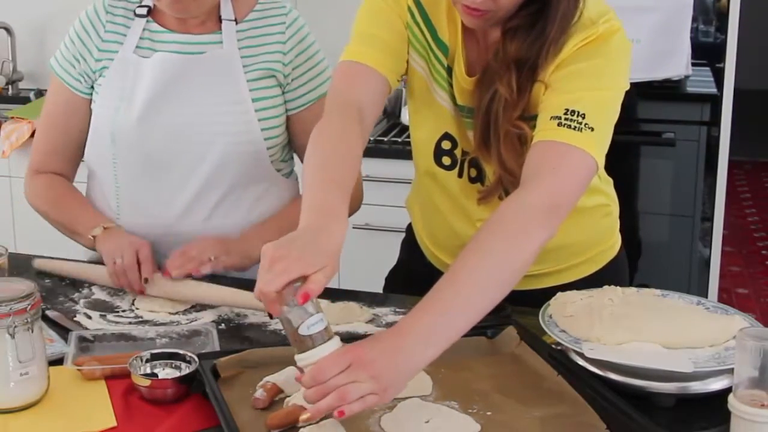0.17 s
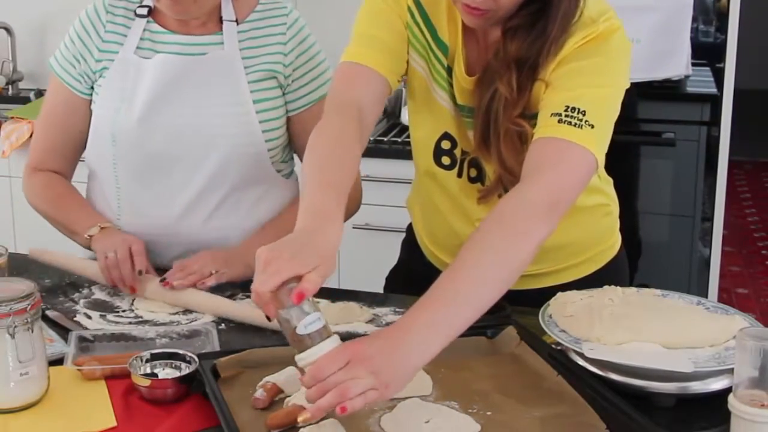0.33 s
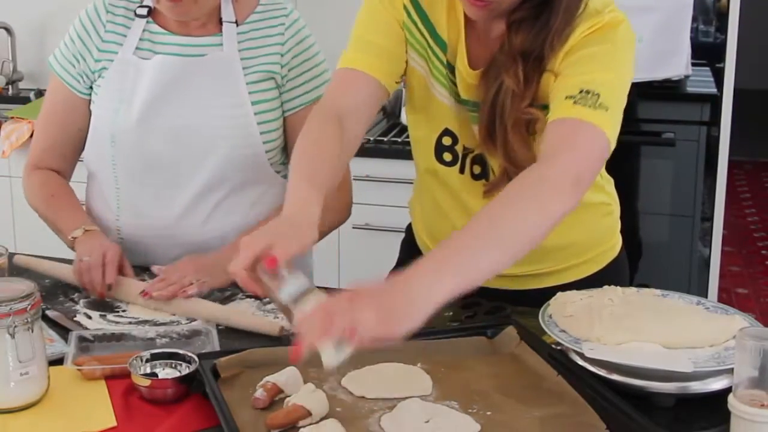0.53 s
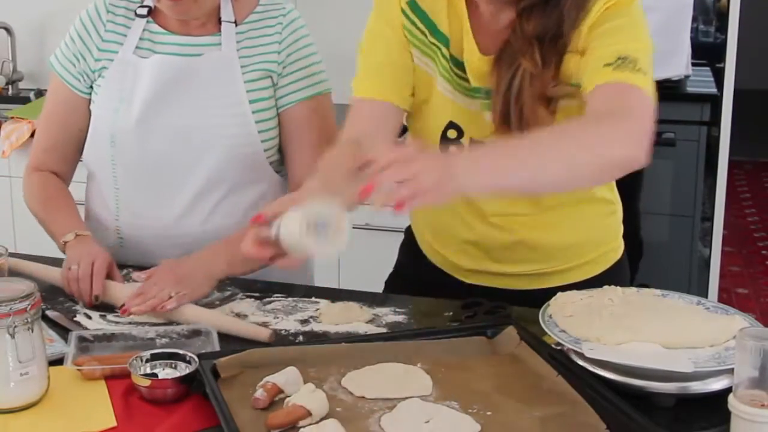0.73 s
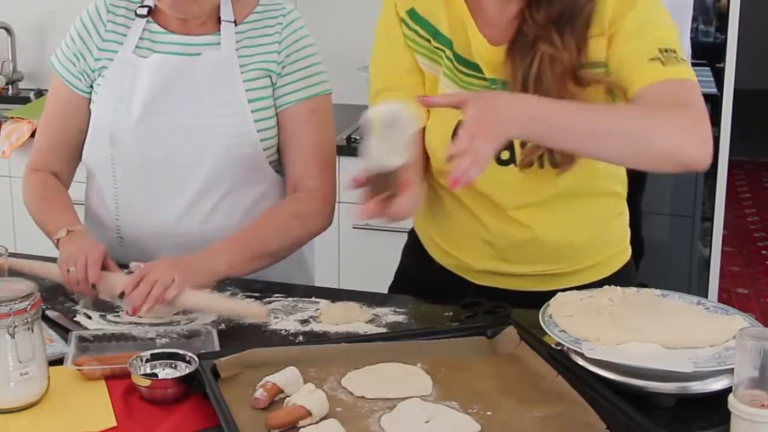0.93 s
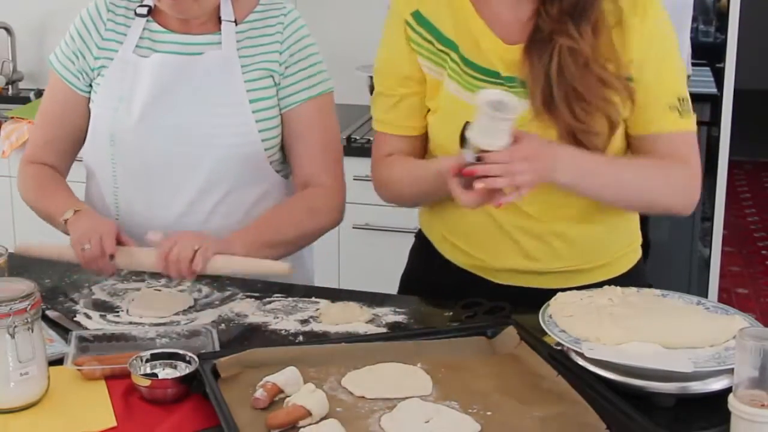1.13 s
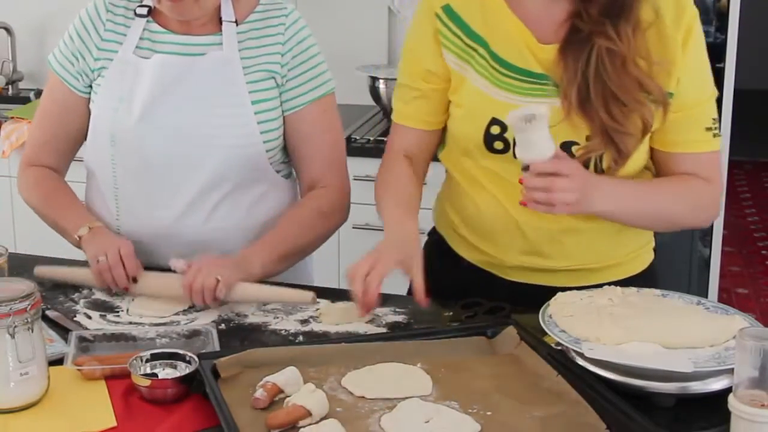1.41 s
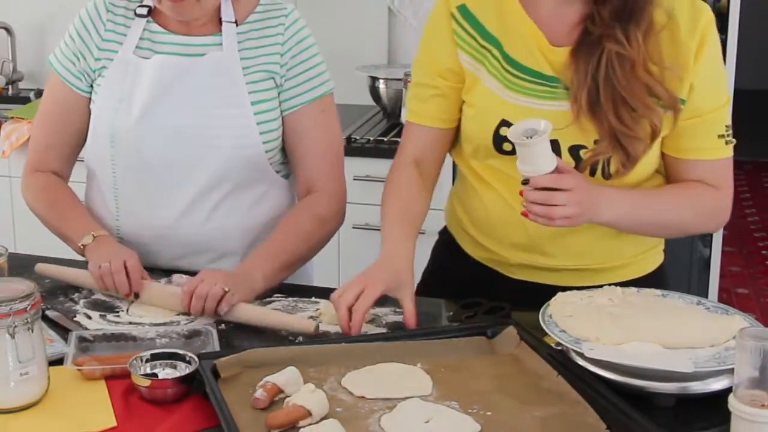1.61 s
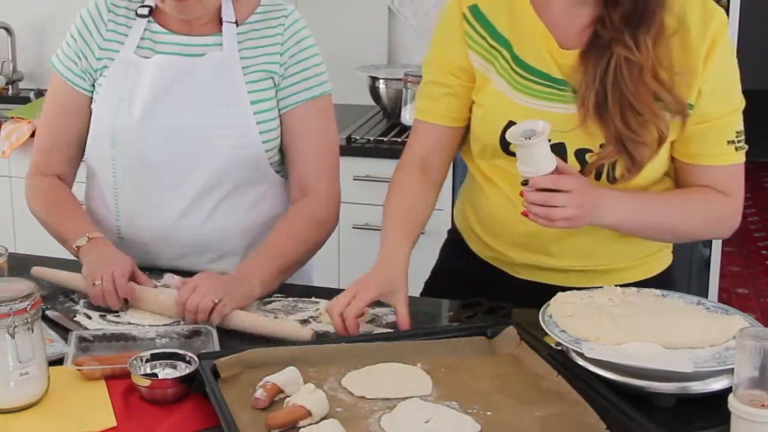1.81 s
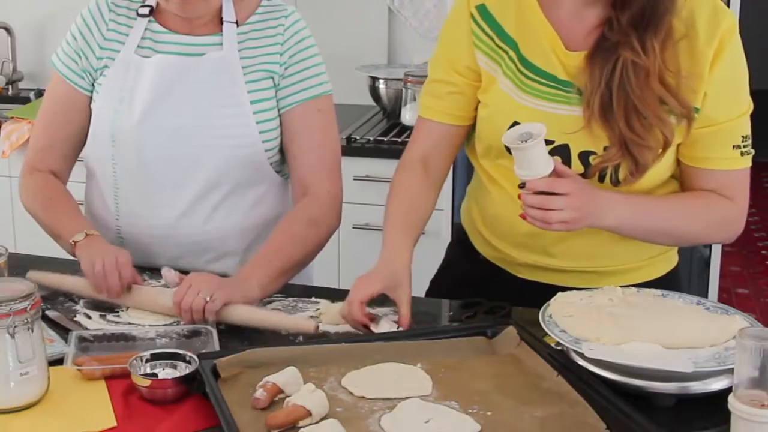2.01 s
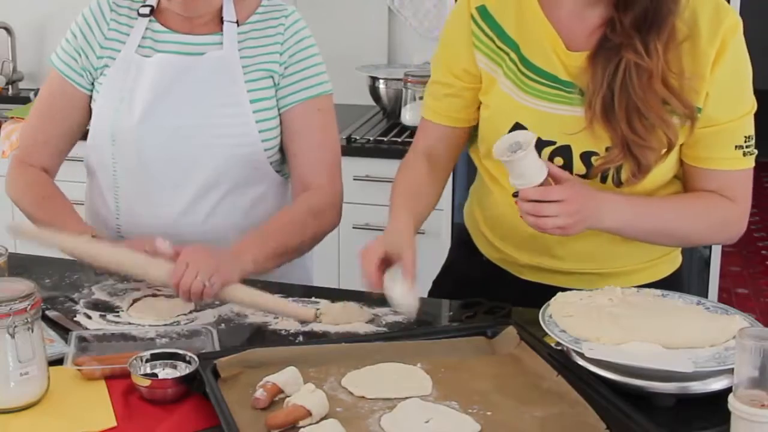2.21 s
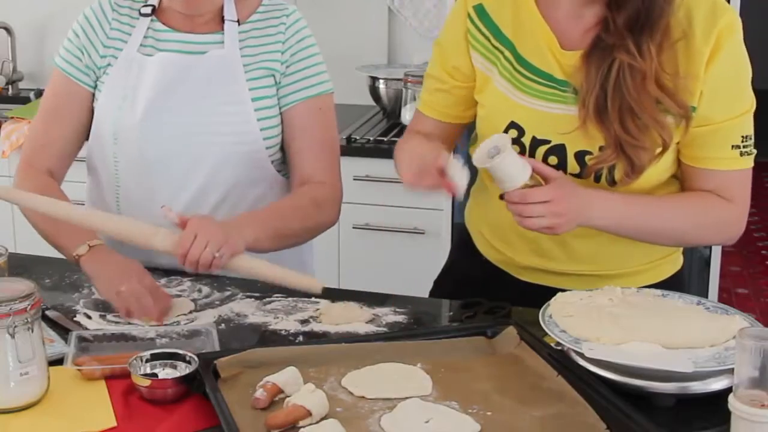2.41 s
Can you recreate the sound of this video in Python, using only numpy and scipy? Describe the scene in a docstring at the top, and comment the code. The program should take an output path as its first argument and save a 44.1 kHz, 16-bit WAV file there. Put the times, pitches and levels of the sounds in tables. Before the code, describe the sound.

A wooden rolling pin knocks sharply twice on a stone worktop, then once more softly; later a jar cap taps twice with a tiny glass clink and clicks shut, in a quiet hard-walled kitchen, close stereo microphone.

```python
"""Small dry ticks over a steady room tone, then a long wooden rolling pin knocks on a stone worktop.
Later a spice jar's cap is tapped down twice, with a clink of glass, and clicked back on; hands rustle faintly.
Struck bodies are sums of damped resonances, muted by contact time; ticks are single heavily damped rings.
A hard-walled kitchen carries each short knock on; tone, rustle and traffic are coloured noise, hum is sines."""
import sys
import numpy as np
from scipy import signal
from scipy.fft import rfft, irfft, next_fast_len
from scipy.io import wavfile
from scipy.ndimage import map_coordinates

SR = 44100
rng = np.random.default_rng(int(sys.argv[2]) if len(sys.argv) > 2 else 0)


def to_wav(sig):
    """Store sig (one row per channel, or 1-D mono) as 16-bit WAV at the path in sys.argv[1].

    Samples outside -1..1 are clipped; the rate is SR.
    """
    pcm = np.clip(np.atleast_2d(sig), -1, 1) * 32767
    pcm = np.round(pcm).astype(np.int16)
    wavfile.write(sys.argv[1], SR, pcm.T)  # frames by channels


def gain_from_decibels(decibels):
    """Convert decibel values to linear amplitude factors."""
    exponent = np.asarray(decibels, float) / 20
    return 10 ** exponent


N = 112454  # samples

# pin blows: start_s, strength_db, contact_ms, thud_db
PIN_KNOCKS = [(.2005, -26, 0.098, -10.5), (.3372, -25.5, 0.17, -9.5), (1.492, -30.5, 0.14, -5.5)]
# pin: dry crack, bending modes in order, slower twin of the main mode, high rattle: center_hz, width_hz, level_db
PIN_MODES = [(2680, 2900, 18.5), (620.6, 25.8, -8), (1358, 52, 3.5), (2410, 126, 11), (3585, 172, 8.5),
             (5036, 180, 0), (1364.4, 6.7, -7), (3260, 560, 10.5)]
# blow position along the pin: spot (0-1)
PIN_SPOTS = [.03, .165, .12]


def rolling_pin():
    """Bending modes of a wooden bar, weighted by where it lands; worktop and cupboard answer."""
    return knocks(PIN_KNOCKS, PIN_MODES, cabinet, PIN_SPOTS)


# cap taps: start_s, strength_db, contact_ms, thud_db
CAP_KNOCKS = [(2.0195, -33.5, 0.11, -13), (2.179, -33, 0.085, -15)]
# cap modes by number of nodes round the rim, wide ones are clatter: center_hz, width_hz, level_db
CAP_MODES = [(1091, 46, 5), (3375, 60, 5.5), (1700, 136, 8.5), (400, 150, 1), (1420, 310, 8.5),
             (3790, 390, 11), (3000, 210, 5), (4700, 3800, 22), (2000, 2500, 16.5)]
# tap position round the rim: spot (0-1)
CAP_SPOTS = [.245, .48]


def spice_cap():
    """Rim modes of the cap, weighted by where it strikes, with the worktop thud."""
    return knocks(CAP_KNOCKS, CAP_MODES, modes(WORKTOP_MODES), CAP_SPOTS)


# glass contacts, no thud: start_s, strength_db, contact_ms
GLASS_KNOCKS = [(2.0195, -60, 0.0135), (2.028, -47.5, 0.026)]
# glass resonances: center_hz, width_hz, level_db
GLASS_MODES = [(5830, 300, 13), (7400, 980, 12.5), (9720, 380, 14.5), (13300, 310, -5), (10900, 6800, 18)]


def glass():
    """Glass touches glass: high modes under very short contacts."""
    return knocks(GLASS_KNOCKS, GLASS_MODES, cabinet, [0, 0])


# cap closing on the jar: start_s, strength_db, contact_ms, thud_db
JAR_KNOCKS = [(2.4755, -48, 0.038, -6)]
# hollow jar resonances: center_hz, width_hz, level_db
JAR_MODES = [(641, 15.7, 0.5), (1360, 120, 2.5), (4200, 330, 2)]


def jar():
    """The cap closes on the hollow jar, ringing its modes and the worktop."""
    return knocks(JAR_KNOCKS, JAR_MODES, cabinet, [0])


def knocks(rows, body, base, spots):
    """A body rings and its base thuds; the spot weighs the modes, longer contact mutes the high ones."""
    room = kitchen()
    out = 0
    for (start_s, strength_db, contact_ms, *thud_db), spot in zip(rows, spots):
        struck = []
        for k, (center_hz, width_hz, level_db) in enumerate(body):
            spot_gain = abs(np.cos(np.pi * k * spot)) + 0.081
            struck.append((center_hz, width_hz, level_db + 20 * np.log10(spot_gain)))
        thud_gain = gain_from_decibels(np.array(thud_db)).sum()  # 0 if the row has no thud

        def response(hz):
            ring = modes(struck)(hz) + thud_gain * base(hz)
            return gain_from_decibels(strength_db) * ring / (1 + 1j * hz * contact_ms / 1000) ** 6

        out = out + placed(start_s, response, room)
    return out


# worktop resonances: center_hz, width_hz, level_db
WORKTOP_MODES = [(244, 136, 7), (458, 96, 6.5), (1070, 100, -7), (1114, 140, 7), (2000, 860, 17)]
# boom of the cupboard under the worktop: center_hz, width_hz, level_db
CUPBOARD_MODES = [(60.8, 18, -6), (162.4, 79, 4)]


def cabinet(hz):
    """The worktop thuds at once; cupboard air swells in after it, each resonance acting twice."""
    out = modes(WORKTOP_MODES)(hz)
    for row in CUPBOARD_MODES:
        out = out + modes([row])(hz) * resonance(hz, row[0], row[1])
    return out


# small dry ticks: start_s, strength_db, center_hz, width_hz
TICKS = [(0.032, -35.5, 3000, 1200), (0.05, -40.5, 7000, 5000), (0.26, -26.5, 7400, 6000),
         (.3765, -31.5, 7000, 4860), (0.879, -38.5, 1220, 200), (1.086, -38, 3700, 1500),
         (1.823, -35, 5400, 2000), (1.832, -32.5, 3510, 610), (2.475, -37, 6000, 4000)]


def ticks():
    """Each tick is one heavily damped ring, applied twice to close it off above and below."""
    out = 0
    for start_s, strength_db, center_hz, width_hz in TICKS:
        ring = placed(start_s, lambda hz: resonance(hz, center_hz, width_hz) ** 2, kitchen())
        out = out + gain_from_decibels(strength_db) * np.sqrt(SR / width_hz) * ring
    return out


# scattered wall echoes: delay_s, level_db, smear_s
WALLS = [(.002, -0.5, 0.016), (.016, -9, .005)]
# tail decay: freq_hz, t60_s
KITCHEN_DECAY = [(60, 0.49), (250, 0.69), (1000, 0.55), (3000, 0.6), (6000, 0.34), (12000, 0.14)]
# left-right likeness of tail and echoes: freq_hz, likeness (0-1)
TAIL_ALIKE = [(100, 1), (1000, 0.83), (3000, 0.56), (10000, 0.26)]


def kitchen():
    """Shadowed direct sound, a clean echo, scattering walls, a tail that builds up, dying faster in the treble."""
    wet_db, build_s = 4, 0.0027
    shadow_hz, direct_db = 6000, -2.5  # hands and dishes hide the direct path in the treble
    splash_s, splash_db = 0.004, 1  # tiled wall behind
    hz, t, z = signal.stft(rng.standard_normal((2, SR)), SR, nperseg=256)
    decay = gain_from_decibels(-60 * t / along(KITCHEN_DECAY, hz)[:, None])
    tail = signal.istft(z * decay, SR, nperseg=256)[1][:, :SR]
    t = np.arange(SR) / SR
    tail = paired(tail, TAIL_ALIKE) * (1 - np.exp(-t / build_s))
    room = gain_from_decibels(wet_db) * tail / np.linalg.norm(tail[0])
    size = SR // 10
    for delay_s, level_db, smear_s in WALLS:
        echo = paired(rng.standard_normal((2, size)), TAIL_ALIKE) * np.exp(-t[:size] / smear_s)
        room[:, round(delay_s * SR):][:, :size] += gain_from_decibels(level_db) * echo / np.linalg.norm(echo[0])
    room += filtered(1. * (t == 0), lambda f: gain_from_decibels(direct_db) / (1 + 1j * f / shadow_hz) ** 2)
    room[:, round(splash_s * SR)] += gain_from_decibels(splash_db)
    return room


def placed(start_s, response, room):
    """An impulse at start_s, heard through a body and the room."""
    blow = np.zeros(SR // 2)
    blow[0] = 1
    heard = signal.fftconvolve(filtered(blow, response)[None], room, axes=1)
    out = np.zeros((2, N + 2 * SR))
    out[:, round(start_s * SR):][:, :heard.shape[1]] = heard
    return out[:, :N]


def resonance(hz, center_hz, width_hz):
    """Bandpass response of one damped resonance, unity at its centre."""
    return 1j * hz * width_hz / (center_hz ** 2 - hz * hz + 1j * hz * width_hz)


def modes(table):
    """Causal resonances of alternating sign; starting size follows level_db, whatever the width."""
    def response(hz):
        out = 0
        for k, (center_hz, width_hz, level_db) in enumerate(table):
            ring = 1j * hz / 2 / (center_hz ** 2 - hz * hz + 1j * hz * width_hz)
            out = out + (-1) ** k * gain_from_decibels(level_db) * SR / np.pi * ring
        return out
    return response


def unit(x):
    """Scaled to rms 1."""
    return x / np.sqrt(np.mean(x ** 2) + 1e-20)


def along(points, hz):
    """(freq_hz, value) points interpolated on a log frequency axis."""
    f, v = np.transpose(points)
    return np.interp(np.log(hz + 1), np.log(f + 1), v)


def filtered(x, response):
    """x times a complex response of frequency."""
    m = next_fast_len(x.shape[-1] + SR // 2)
    spectrum = rfft(x, m) * response(np.fft.rfftfreq(m, 1 / SR))
    return irfft(spectrum, m)[..., :x.shape[-1]]


def paired(pair, alike, spectrum=((1, 0),)):
    """Two unrelated signals mixed to the wanted left-right likeness and coloured."""
    def response(hz):
        turn = np.arccos(np.clip(along(alike, hz), -1, 1)) / 2
        return gain_from_decibels(along(spectrum, hz)) * [np.cos(turn), np.sin(turn)]
    mid, side = filtered(pair, response)
    return np.array([mid + side, mid - side])


# left-right likeness of the background noises: freq_hz, likeness (0-1)
TONE_ALIKE = [(60, 0.18), (240, 0.17), (930, 0.0076), (3670, 0.017), (14400, 0.061)]


def wide_noise(spectrum, gain=1):
    """Stereo noise of rms 1: white noise times gain, then coloured."""
    return unit(paired(rng.standard_normal((2, N)) * gain, TONE_ALIKE, spectrum))


# rustle level: time_s, level_db
RUSTLE_LEVEL = [(0, -60), (.12, -76), (.8, -82), (1.1, -55), (1.4, -67), (2.55, -67)]
# cloth colour, relative density: freq_hz, density_db_per_hz
CLOTH = [(300, -40), (1000, 0), (3500, 5), (9000, -3), (15000, -27)]


def rustle():
    """Hands rustle: noise broken into grains by a random gain, under a slow level curve."""
    t = np.arange(N) / SR
    grain_db = 3 * map_coordinates(rng.standard_normal(400), [t * 90])  # 90 random points per s
    return wide_noise(CLOTH, gain_from_decibels(grain_db)) * gain_from_decibels(np.interp(t, *np.transpose(RUSTLE_LEVEL)))


# room tone colour, relative density: freq_hz, density_db_per_hz
TONE = [(24, -27), (40, -31), (110, -2), (274, -2.5), (495, -5), (560, -8), (830, -7), (1140, -7),
        (1500, -10.5), (4660, -17), (14500, -28)]


def room_tone():
    """Steady coloured noise."""
    tone_db = -53.5  # rms
    return gain_from_decibels(tone_db) * wide_noise(TONE)


# appliance hum: freq_hz, level_db (sine peak is 0.5 dB above)
HUM = [(99, -65), (250, -71.5)]


def hum():
    """Appliance hum: steady sines of random phase, alike in both channels."""
    t = np.arange(N) / SR
    return sum(gain_from_decibels(level_db + 0.5) * np.sin(2 * np.pi * hz * t + 6 * rng.random()) for hz, level_db in HUM)


# far traffic colour, relative density: freq_hz, density_db_per_hz
RUMBLE = [(20, 3), (45, -10), (70, 5), (110, -36)]


def rumble():
    """Far traffic: low noise, closed off by 200 Hz."""
    rumble_db = -62  # rms
    return gain_from_decibels(rumble_db) * wide_noise([*RUMBLE, (200, -120)])


def scene():
    """Knocks a little left of centre, then ticks and background."""
    pan_db = 1.2  # left over right
    hits = rolling_pin() + spice_cap() + glass() + jar()
    background = rustle() + room_tone() + hum() + rumble()
    return hits * gain_from_decibels([[pan_db / 2], [-pan_db / 2]]) + ticks() + background


def top_cut(x):
    """Nothing passes above the cut-off."""
    return signal.sosfilt(signal.butter(12, 15040, fs=SR, output="sos"), x)


def record(dry):
    """Second-order bass cut and a sharp band limit."""
    top_hz, bass_cut_hz = 15000, 40
    heard = filtered(dry, lambda hz: (hz < top_hz) * (1j * hz / (bass_cut_hz + 1j * hz)) ** 2)
    return top_cut(heard)


dry = scene()
out = record(dry)
to_wav(out)
```